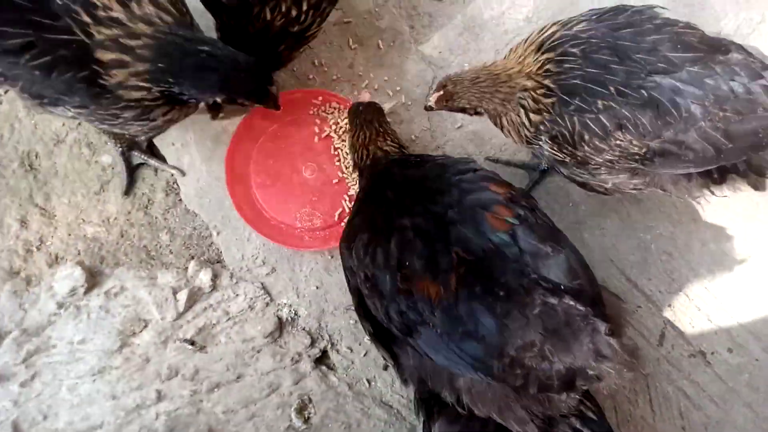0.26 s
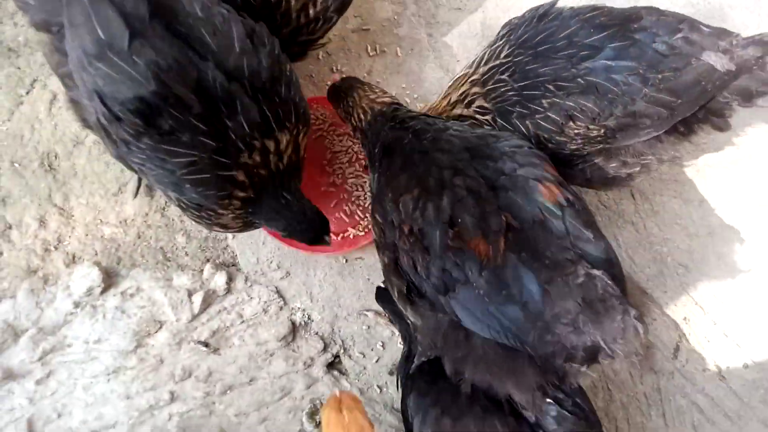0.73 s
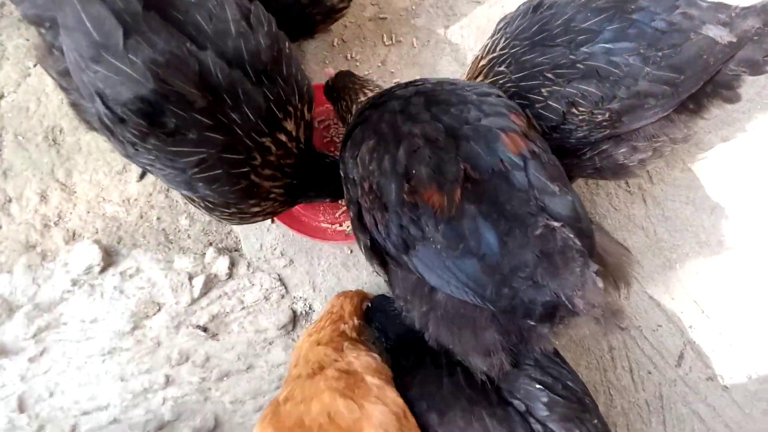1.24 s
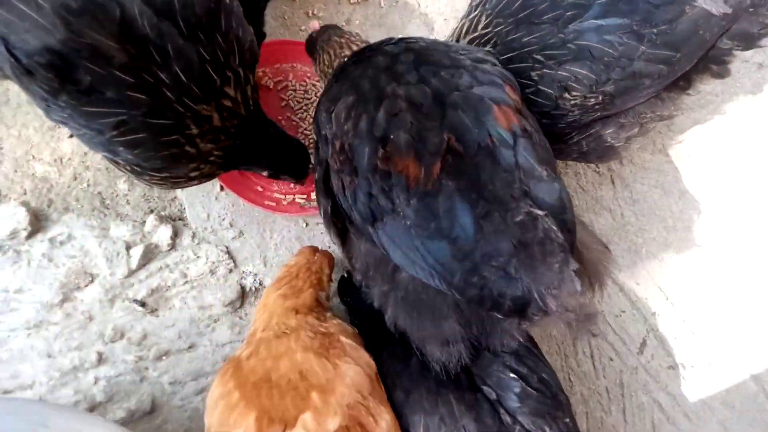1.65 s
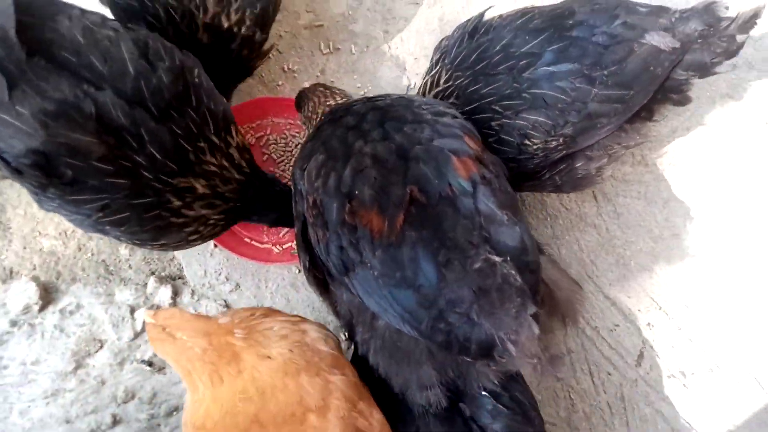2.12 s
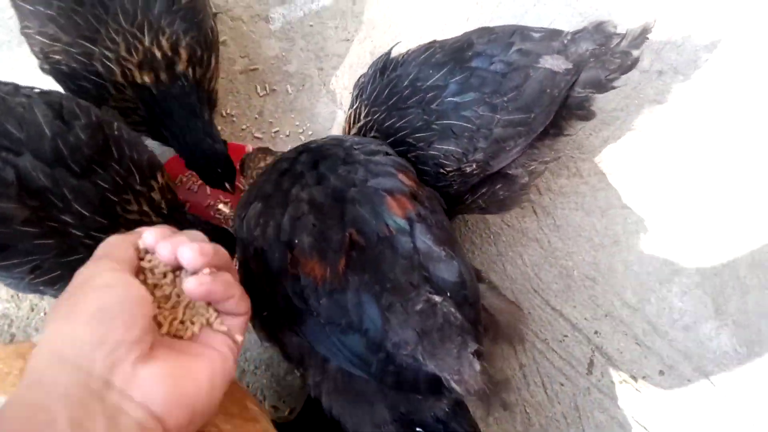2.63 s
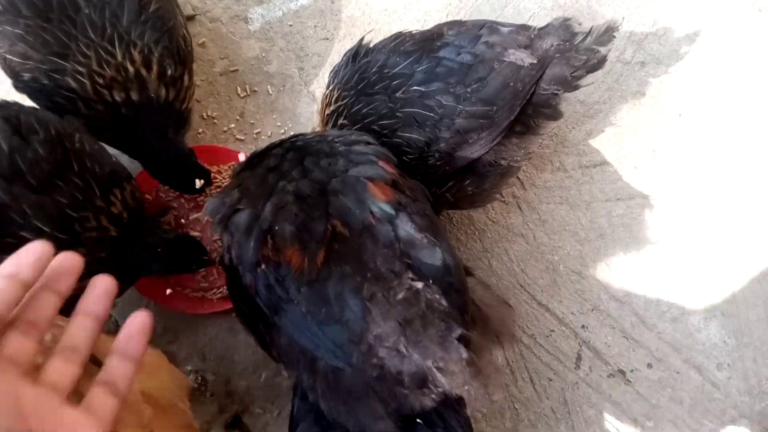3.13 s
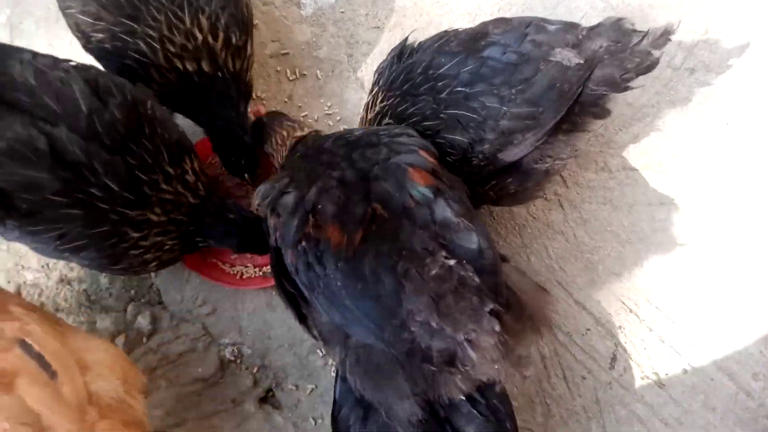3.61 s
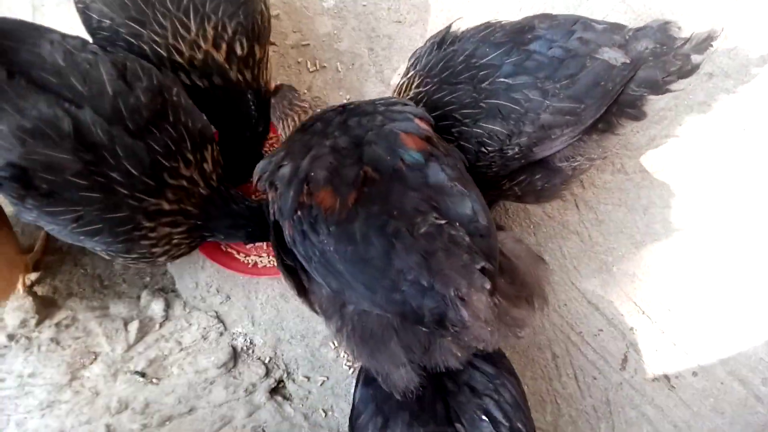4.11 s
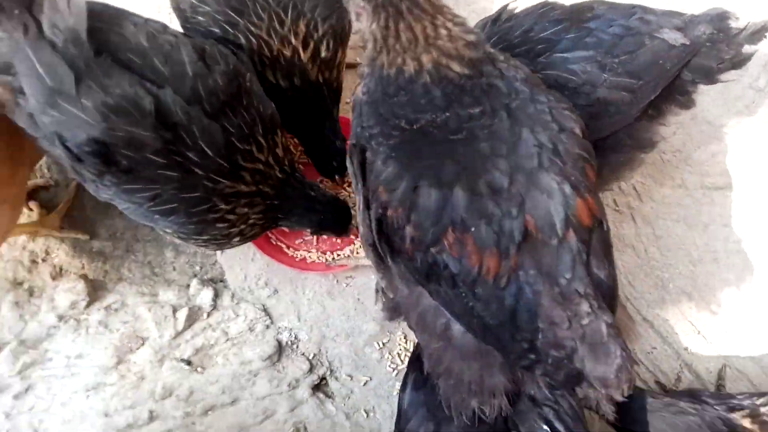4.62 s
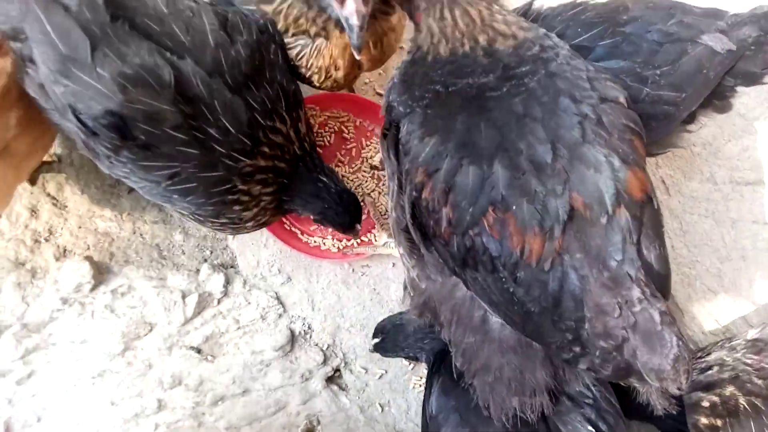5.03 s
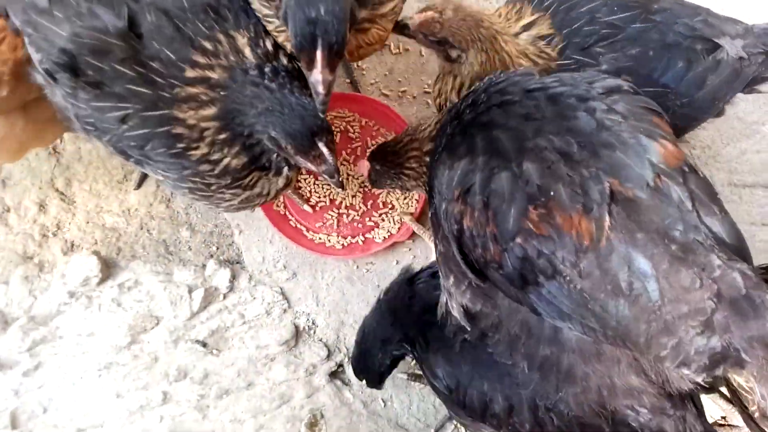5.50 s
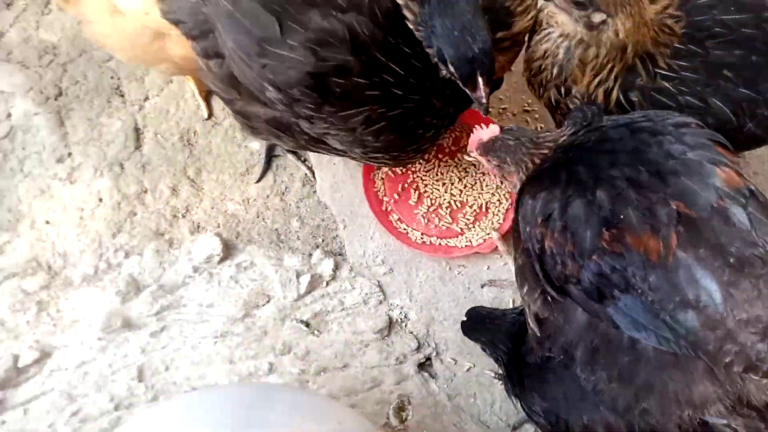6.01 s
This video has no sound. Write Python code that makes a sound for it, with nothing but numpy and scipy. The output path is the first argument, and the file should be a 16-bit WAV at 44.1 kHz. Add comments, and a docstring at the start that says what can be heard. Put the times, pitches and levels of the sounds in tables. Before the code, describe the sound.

A close, dry phone pickup above hens eating from a plastic plate on concrete. From the start, beaks strike in rapid, uneven flurries, about twenty crisp gritty clicks per second, with small plasticky ticks and a bright hiss of scattering kernels; strong taps fall near 0.1 and 0.65 s. At 1.3 s a hollow low knock sounds from a tub beside the microphone, followed by softer bumps, humming scrapes and sizzling grain until about 2.5 s. Around 2.9-3.2 s grain swishes and rattles while pecks cluster. Tub knocks return from 3.6 to 5 s, with a short low cluck near 4.15 s. Pecking nearly stops from 5 to 5.5 s, leaving grain rustle and tiny cheeps. From 5.6 s, pecks and the heaviest hollow thumps resume to the end at about 6.4 s. Faint cheeps and a low, steady yard murmur lie underneath.

```python
"""Hens at a plate of grain

Hens crowd a plastic plate on concrete; the microphone is a phone held close above them.
Beaks burst sprays of noise grains that ring plate and rim; sliding kernels hiss and rattle.
Low raps ring damped modes; beside the phone a hand knocks and scrapes a feed tub with its own air note.
Birds cheep, cluck and coo softly as gliding whistles, over a faint yard murmur of filtered noise."""
import sys
import numpy as np
from scipy import signal
from scipy.fft import rfft, irfft
from scipy.io import wavfile
from scipy.ndimage import uniform_filter1d

SR = 44100
rng = np.random.default_rng(int(sys.argv[2]) if len(sys.argv) > 2 else 0)


def persist_wave(psi):
    """Save psi, clipped to +-1, as 16-bit WAV."""
    counts = np.round(np.clip(psi, -1, 1) * 32767).astype(np.int16)
    wavfile.write(sys.argv[1], SR, np.atleast_2d(counts).T)


N = 275669

# Beak blows close below the phone: start_s, crack_db, plate_db, added_ring_hz, rim_db, scatter_t60_s
BEAK_BLOWS = [(0.0717, -37.5, -48, 1700, -46, 0.025), (0.0847, -38, -33, 1760, -33, 0.0086),
              (0.1021, -25.5, -21, 1710, -18.5, 0.012), (0.1122, -30, -28, 1700, -41, 0.013),
              (0.125, -33, -45, 1700, -46, 0.022), (0.1421, -33, -38, 1670, -36, 0.025),
              (0.159, -30, -47, 1430, -39, 0.02), (0.1792, -27, -32.5, 1680, -31, 0.025),
              (0.2035, -26, -31, 1740, -46, 0.021), (0.2564, -30, -46, 1780, -52, 0.025),
              (0.268, -36.5, -56, 1750, -48, 0.037), (0.3042, -34, -47, 1790, -44, 0.028),
              (0.3224, -34.5, -50, 1780, -43, 0.023), (0.3721, -33, -36.5, 1740, -37, 0.018),
              (0.3846, -32, -51, 1720, -50, 0.018), (0.413, -33.5, -49, 1400, -50, 0.029),
              (0.4605, -36, -44.5, 1760, -51, 0.03), (0.5327, -33, -32.5, 1680, -43, 0.053),
              (0.5426, -28.5, -32, 1650, -32.5, 0.033), (0.5684, -29, -39, 1700, -38, 0.056),
              (0.61, -40, -32, 1400, -33, 0.016), (0.633, -31, -35.5, 1520, -34, 0.0083),
              (0.6487, -23.5, -26, 1680, -24.5, 0.037), (0.6664, -34, -47, 1600, -42, 0.052),
              (0.689, -30.5, -59, 1400, -39, 0.02), (0.73, -40, -52, 1700, -48, 0.021),
              (0.7832, -29, -63, 1710, -45, 0.013), (0.8225, -34.5, -65, 1450, -46, 0.02),
              (0.848, -38, -39.5, 1400, -43, 0.062), (0.9064, -26.5, -31.5, 1740, -31, 0.034),
              (0.9464, -31.5, -48, 1360, -52, 0.021), (1.0794, -40, -72, 1820, -65, 0.025),
              (1.1162, -40.5, -49.5, 1390, -49, 0.04), (1.172, -40, -62, 1820, -49, 0.04),
              (1.236, -41, -39, 1660, -44, 0.022), (1.2551, -33, -30.5, 1430, -34.5, 0.037),
              (1.313, -36, -46, 1600, -35, 0.03), (1.3666, -32.5, -41.5, 1430, -43, 0.03),
              (1.4658, -30, -52, 1760, -41, 0.028), (1.4882, -33, -27, 1600, -27.5, 0.023),
              (1.4979, -36, -37, 1540, -41, 0.03), (1.5226, -32, -32, 1660, -36, 0.034),
              (1.568, -23.5, -51, 1700, -52, 0.0083), (1.5821, -23.5, -42.5, 1370, -43, 0.036),
              (1.6333, -29, -60, 1380, -54, 0.016), (1.669, -33, -39, 1620, -41, 0.061),
              (1.714, -36, -43, 1550, -51, 0.02), (1.742, -37.5, -44, 1530, -51, 0.036),
              (1.782, -35, -48, 1380, -50, 0.075), (1.8364, -39, -46, 1420, -56, 0.023),
              (1.8843, -49, -40, 1450, -50, 0.015), (1.906, -41, -35.5, 1450, -36.5, 0.022),
              (1.9577, -31, -32, 1480, -27.5, 0.017), (2.0164, -36, -41.5, 1830, -40, 0.054),
              (2.0367, -36, -44, 1380, -51, 0.026), (2.1017, -52, -39, 1600, -49, 0.037),
              (2.1243, -51, -35, 1690, -57, 0.021), (2.2135, -41, -46, 1590, -46, 0.057),
              (2.277, -31.5, -33.5, 1400, -39, 0.039), (2.2858, -34.5, -37, 1380, -37, 0.018),
              (2.3512, -37.5, -36.5, 1460, -42, 0.021), (2.3655, -38.5, -58, 1360, -54, 0.018),
              (2.4346, -40.5, -49, 1690, -45, 0.028), (2.4488, -34, -29.5, 1360, -35, 0.028),
              (2.464, -33, -36, 1350, -32.5, 0.028), (2.4833, -34, -38, 1570, -48, 0.016),
              (2.5727, -43, -36.5, 1430, -43, 0.048), (2.6128, -36, -27.5, 1590, -35, 0.026),
              (2.6235, -30, -50, 1700, -44, 0.028), (2.6802, -40, -35, 1600, -37, 0.017),
              (2.692, -30, -46, 1510, -44, 0.017), (2.7242, -43, -38, 1420, -37, 0.027),
              (2.7602, -39, -38, 1396, -48, 0.028), (2.816, -44, -40, 1400, -51, 0.025),
              (2.8247, -31.5, -36.5, 1500, -36, 0.019), (2.8568, -36.5, -33.5, 1450, -39, 0.031),
              (2.891, -35, -42, 1400, -39, 0.017), (2.9144, -29, -34.5, 1440, -43, 0.033),
              (2.9834, -35, -34, 1420, -46, 0.032), (3.0158, -29.5, -38, 1450, -42, 0.025),
              (3.034, -28.5, -38, 1520, -41, 0.029), (3.054, -35, -49, 1780, -48, 0.026),
              (3.0745, -30.5, -40, 1370, -42, 0.019), (3.0872, -25.5, -36, 1530, -48, 0.013),
              (3.122, -29, -39, 1460, -44, 0.012), (3.1376, -25.5, -31.5, 1700, -48, 0.045),
              (3.217, -37, -41, 1410, -39, 0.025), (3.2407, -39, -38, 1510, -42, 0.03),
              (3.264, -33, -34.5, 1590, -38, 0.025), (3.2943, -36, -48, 1670, -49, 0.035),
              (3.3356, -43, -47, 1440, -57, 0.018), (3.3704, -46, -48, 1370, -49, 0.0093),
              (3.3914, -33, -33, 1620, -45, 0.02), (3.3981, -27.5, -30.5, 1650, -34, 0.025),
              (3.468, -43, -38.5, 1430, -44, 0.051), (3.4844, -41, -44, 1500, -51, 0.038),
              (3.531, -30.5, -29, 1520, -31.5, 0.05), (3.5787, -31, -37, 1640, -35, 0.025),
              (3.5923, -31.5, -38, 1370, -38, 0.028), (3.6326, -32.5, -51, 1530, -45, 0.053),
              (3.7421, -37, -36, 1650, -51, 0.029), (3.7499, -31.5, -41, 1440, -54, 0.042),
              (3.7606, -34, -33.5, 1850, -48, 0.039), (3.7739, -41, -38, 1870, -49, 0.029),
              (3.8195, -44, -36, 1400, -44, 0.056), (3.8534, -39, -57, 1350, -49, 0.056),
              (3.895, -33, -35.5, 1470, -34.5, 0.023), (3.938, -42, -38.5, 1860, -53, 0.033),
              (3.9438, -35.5, -38.5, 1490, -33.5, 0.043), (4.0008, -44.5, -43, 1390, -48, 0.05),
              (4.183, -34, -34, 1450, -31, 0.026), (4.2456, -36, -34, 1810, -41, 0.009),
              (4.2694, -24.5, -27, 1500, -24.5, 0.024), (4.3534, -40, -42, 1680, -47, 0.025),
              (4.384, -46, -44, 1350, -47, 0.025), (4.4093, -39.5, -36, 1484, -42, 0.034),
              (4.496, -42, -47, 1630, -55, 0.065), (4.5372, -32.5, -32, 1530, -37, 0.027),
              (4.5503, -36, -38, 1600, -37, 0.022), (4.5998, -35, -35.5, 1550, -38, 0.019),
              (4.6645, -33, -33, 1390, -37, 0.033), (4.7059, -36, -40, 1470, -38.5, 0.027),
              (4.8237, -33, -41, 1560, -37.5, 0.041), (4.859, -34.5, -48, 1540, -46, 0.038),
              (4.9672, -32, -42, 1470, -36, 0.016), (5.3262, -33, -63, 1460, -52, 0.034),
              (5.522, -36, -54, 1370, -49, 0.029), (5.5774, -29, -63, 1730, -63, 0.03),
              (5.6116, -30.5, -46, 1740, -53, 0.033), (5.6348, -25, -47, 1730, -42, 0.037),
              (5.6668, -25.5, -28, 1450, -25.5, 0.021), (5.7134, -27, -30.5, 1510, -27.5, 0.048),
              (5.7568, -25, -27.5, 1740, -28, 0.036), (5.777, -27, -45, 1420, -39, 0.027),
              (5.7974, -29, -35, 1380, -42, 0.035), (5.8132, -28.5, -49, 1740, -37, 0.048),
              (5.8404, -26.5, -50, 1720, -53, 0.063), (5.8686, -26.5, -65, 1680, -61, 0.03),
              (5.9264, -43, -40, 1880, -58, 0.042), (5.9782, -25, -33, 1460, -27, 0.054),
              (6.0155, -27, -34, 1360, -33, 0.05), (6.0397, -34.5, -49, 1600, -39, 0.063),
              (6.1103, -43, -40.5, 1430, -46, 0.049), (6.126, -39.5, -52, 1390, -48, 0.054),
              (6.1683, -37, -35.5, 1410, -38, 0.025), (6.1883, -37, -35, 1660, -34.5, 0.04)]
# Ringing of the middle of the plate: pitch_hz, level_db, t60_s
PLATE_MODES = [(1400, -16, 0.087), (1570, -14, 0.04), (1700, 2.5, 0.0076), (1905, -3, 0.0067)]
# Ringing of the plate's rim: pitch_hz, level_db, t60_s
RIM_MODES = [(2450, 14, 0.0041), (2758, -0.5, 0.023), (3200, -1, 0.016), (3650, 1, 0.028)]
# Tone colour of cracking and sliding kernels: pitch_hz, relative_db
KERNEL_COLOUR = [(1530, -17.5), (2600, 0), (3670, 10.5), (3990, 16), (5060, 16.5), (5420, 17.5),
                 (6470, 19.5), (9550, 4.5), (11700, -16), (13800, -26), (15100, -9.5), (16200, -13)]
RISE_SHARE = 0.048  # a spray swells for this share of its scatter time


def pecks():
    """A spray of kernels swells and dies; it rings the middle and the rim of the plate."""
    t = np.arange(SR // 9) / SR
    crack, plate, rim = np.zeros(N), np.zeros(N), np.zeros(N)
    noises = rng.standard_normal((len(BEAK_BLOWS), 3, len(t)))
    places = rng.standard_normal((len(BEAK_BLOWS), 4, 4))
    for blow, noise, place in zip(BEAK_BLOWS, noises, places):
        start_s, crack_db, plate_db, added_hz, rim_db, t60 = blow
        crack_noise, ring_noise, unevenness = noise
        t60 = np.clip(t60, .004, .2)
        swell = np.minimum(t / (RISE_SHARE * t60), 1) ** 0.6
        decay = np.exp(-np.log(1000) * np.maximum(t / t60 - RISE_SHARE, 0))
        # single kernels stand out of the spray
        spray = swell * decay * undb(1.3 * unit(uniform_filter1d(unevenness, 60)))
        # some sprays crack duller, some brighter
        grit = crack_noise + 0.077 * place[3, 0] * np.roll(crack_noise, 1)
        add(crack, start_s, undb(crack_db) * crest(grit * spray))
        plate_modes = spot(PLATE_MODES, *place[:2]) + [(added_hz, 0, .022)]
        add(plate, start_s, undb(plate_db) * crest(ring(ring_noise * spray, plate_modes)))
        rim_modes = spot(RIM_MODES, *place[2:])
        add(rim, start_s, undb(rim_db) * crest(ring(ring_noise * spray, rim_modes)))
    return colour(crack, KERNEL_COLOUR) + small(plate, 1286) + small(rim, 1940)


# Trickle of grain between the sweeps: time_s, rustle_db, plate_rattle_db
TRICKLE = [(0, -51.5, -60), (.9, -43, -52.5), (1.05, -51, -63), (1.5, -44, -67), (2.3, -55.5, -59),
           (2.41, -61, -74), (2.6, -55.5, -57), (3.3, -53, -69), (4.0, -53.5, -55.5), (4.4, -50, -56),
           (4.46, -61.5, -89), (4.6, -45, -51.5), (5.0, -47, -51), (5.25, -42, -63), (5.8, -41, -55),
           (5.92, -53.5, -56), (6.25, -59, -62)]
# Sweeps of a beak or hand through the grain: peak_s, swell_s, fade_s, rustle_db, plate_rattle_db
GRAIN_SWEEPS = [(0, .01, 0.015, -34, -53), (.195, 0.042, 0.042, -35, -42), (.32, 0.042, 0.026, -44, -53),
                (.42, 0.045, 0.02, -37.5, -52), (.56, 0.016, 0.017, -38, -48),
                (.65, 0.0041, 0.015, -29, -35.5), (.74, 0.014, 0.023, -54, -51),
                (.86, 0.014, 0.019, -34, -40), (0.914, 0.011, 0.019, -27, -39.5),
                (1.12, 0.0065, 0.0065, -42, -56), (1.26, 0.041, 0.025, -38.5, -43),
                (1.31, 0.037, 0.036, -35.5, -50), (1.37, 0.028, 0.026, -39, -43.5),
                (1.5, 0.052, 0.065, -39, -46.5), (1.6, 0.042, 0.071, -34.5, -54),
                (1.73, .02, 0.034, -45, -44), (1.84, 0.038, 0.0081, -47, -55),
                (2.12, 0.0051, 0.038, -47, -44), (2.356, 0.029, 0.017, -43, -48),
                (2.47, 0.015, 0.066, -45, -48), (2.752, 0.022, 0.013, -39.5, -43.5),
                (2.89, 0.016, 0.0093, -38, -50), (2.946, 0.021, 0.047, -27.5, -34),
                (3.03, 0.031, 0.031, -42.5, -44.5), (3.142, 0.022, 0.035, -42, -44),
                (3.228, 0.0084, 0.021, -40.5, -44), (3.28, 0.01, 0.031, -41.5, -44.5),
                (3.4, 0.0089, 0.028, -40.5, -44), (3.61, 0.069, 0.065, -38, -48.5),
                (3.771, .015, 0.019, -47, -46), (4.16, 0.069, 0.046, -39.5, -51),
                (4.32, 0.033, 0.031, -43, -44.5), (4.63, 0.018, 0.033, -37, -60),
                (4.72, 0.02, 0.064, -43, -48.5), (4.858, 0.054, 0.055, -43.5, -49),
                (4.983, 0.047, 0.038, -36, -42.5), (5.121, 0.071, 0.064, -34, -75),
                (5.348, 0.11, 0.077, -37.5, -69), (5.54, 0.076, 0.053, -36, -75),
                (5.66, 0.038, 0.095, -38, -44.5), (5.79, 0.059, .052, -32, -42.5),
                (6.04, 0.014, 0.024, -37.5, -46), (6.19, 0.01, 0.029, -42.5, -43)]
SWEEP_EDGE_DB, SWEEP_POINT = -6, 1.9  # fall after one swell or fade time; roundness of the top


def grain():
    """Rolling kernels hiss and shake the plate: a trickle, and a swell with each sweep."""
    t = np.arange(N) / SR
    rustle_power, plate_power = undb(curves(TRICKLE)) ** 2
    for peak_s, swell_s, fade_s, rustle_db, plate_db in GRAIN_SWEEPS:
        side_s = np.where(t < peak_s, swell_s, fade_s)
        shape_db = SWEEP_EDGE_DB * np.abs((t - peak_s) / side_s) ** SWEEP_POINT
        rustle_power = rustle_power + undb(rustle_db + shape_db) ** 2
        plate_power = plate_power + undb(plate_db + shape_db) ** 2
    rustle = unit(colour(kernels(2500, 2.7, 2.16), KERNEL_COLOUR))
    modes = PLATE_MODES + [(hz, db - 5, t60) for hz, db, t60 in RIM_MODES]
    rattle = unit(small(ring(kernels(600, 0.69, 0.81), modes), 1130))
    return np.sqrt(rustle_power) * rustle + np.sqrt(plate_power) * rattle


# Knocks on the tub beside the phone: start_s, level_db, length_s
TUB_KNOCKS = [(1.177, -47.5, 0.02), (1.23, -38.5, 0.036), (1.283, -32.5, 0.035), (1.306, -15, 0.011),
              (1.352, -22.5, 0.014), (1.374, -27, 0.0054), (1.452, -33, 0.0084), (1.575, -25.5, 0.01),
              (1.62, -34, 0.0089), (1.728, -44, 0.013), (1.791, -23, 0.016), (1.836, -29.5, 0.015),
              (1.894, -39, 0.015), (1.962, -23.5, 0.013), (2.034, -30, 0.011), (2.166, -30.5, 0.0077),
              (2.291, -37.5, 0.012), (2.469, -40, 0.018), (2.533, -42.5, 0.014), (2.803, -36, 0.0056),
              (3.584, -42.5, 0.013), (3.748, -38, 0.0063), (3.766, -35, 0.0088), (3.834, -33, 0.008),
              (3.951, -30.5, 0.025), (4.019, -31.5, 0.013), (4.063, -39, 0.019), (4.179, -41, 0.0063),
              (4.224, -41, 0.011), (4.295, -26, 0.015), (4.345, -35, 0.012), (4.385, -20.5, 0.015),
              (4.442, -35.5, 0.01), (4.482, -38, 0.014), (4.532, -26.5, 0.013), (4.625, -36.5, 0.021),
              (4.664, -19.5, 0.017), (4.708, -34, 0.023), (4.734, -27.5, 0.012), (4.756, -29, 0.0105),
              (4.794, -34, 0.008), (4.966, -27, 0.012), (4.997, -34, 0.0071), (5.044, -31, 0.018),
              (5.315, -33.5, 0.0093), (5.56, -37.5, 0.011), (5.637, -17, 0.021), (5.661, -17.5, 0.011),
              (5.709, -25.5, 0.017), (5.749, -31, 0.012), (5.8, -17.5, 0.012), (5.813, -17.5, 0.017),
              (5.98, -27, 0.007), (6.015, -25, 0.0068), (6.049, -16.5, 0.013), (6.113, -20, 0.012),
              (6.125, -25, 0.011), (6.175, -37, 0.012), (6.181, -28, 0.011)]
# Thud of the tub's base: pitch_hz, level_db, t60_s
TUB_BASE_MODES = [(212.8, -7, 0.12), (150, -9.5, 0.037), (390, -10, 0.018)]
TUB_AIR_HZ = 314.7  # note of the air in the tub
KNOCK_WANDER = .025  # spread of that note, as a share, as the grip bends it from knock to knock


def knocks():
    """A soft push booms the air in the tub for a few swings until the hand damps it, and thuds the base."""
    t = np.arange(SR // 5) / SR
    boom, thud = np.zeros(N), np.zeros(N)
    push = np.hanning(int(0.0013 * SR))
    bends = rng.standard_normal(len(TUB_KNOCKS))
    for (start_s, level_db, length_s), bend in zip(TUB_KNOCKS, bends):
        onset = 1 - np.exp(-t / 0.0014)
        fade = np.exp(-(t / max(length_s, .004)) ** 3.9) + 0.16 * np.exp(-t / 0.045)
        air_hz = TUB_AIR_HZ * (1 + KNOCK_WANDER * bend)
        add(boom, start_s, undb(level_db) * np.sin(2 * np.pi * air_hz * t) * fade * onset)
        add(thud, start_s, undb(level_db) * push / push.sum())
    return boom + undb(-6) * small(ring(thud, TUB_BASE_MODES), 92)


# Low, quickly damped knocks, the plate before 1.1 s and the tub wall after:
# start_s, level_db, upper_modes_db, ring_share (share of the ring time left by damping)
DAMPED_RAPS = [(0.101, -37, 4, 0.3), (0.202, -45.5, -1, 0.31), (0.371, -44, -5, 0.34),
               (0.544, -34.5, 3, 0.29), (0.632, -45, 0, 0.35), (0.905, -48, 6, 0.57),
               (1.304, -32.5, -12, 0.29), (1.72, -35.5, -6, 0.25), (1.795, -41, -5, 0.34),
               (1.886, -39, -2, 0.32), (1.963, -40, -5, 0.33), (2.102, -38, -8, 0.46),
               (2.171, -45, -7, 0.39), (2.276, -42.5, 7, 0.39), (2.334, -48, 0, 0.5),
               (2.401, -47, -2, 0.35), (2.469, -42, -4, 0.6), (2.613, -43.5, 5, 0.27), (2.68, -43, 1, 0.29),
               (2.936, -36, 7, 0.26), (3.121, -46, 5, 0.5), (3.217, -43.5, 4, 0.5), (3.392, -46, 11, 0.5),
               (3.469, -46, 4, 0.5), (3.529, -45, 12.5, 0.4), (3.576, -43, 3, 0.44), (3.743, -41, -2, 0.34),
               (3.83, -49, -7, 0.58), (4.386, -36, -7, 0.5), (4.537, -48, 0, 0.5), (4.669, -41, -1, 0.36),
               (5.639, -34, -8, 0.45), (5.671, -21, -11, 0.87), (5.735, -28, -7, 0.5),
               (5.799, -33, -10, 0.5), (5.98, -25.5, -13, 0.71), (6.015, -26, -12, 0.28),
               (6.044, -35, -20, 0.33), (6.176, -37, -9, 0.6)]
# Undamped ringing for raps and scrapes, three low modes then three upper: pitch_hz, level_db, t60_s
WALL_MODES = [(826, 13, 0.15), (763, -7, 0.068), (926, -2, 0.055), (1430, 7, 0.13), (2200, -1, 0.065),
              (2630, 6.5, 0.054)]


def raps():
    """A hard contact rings damped modes; the firmer the damping, the more it drags into a scratch."""
    t = np.arange(SR // 4) / SR
    rung = np.zeros(N)
    grits = rng.standard_normal((len(DAMPED_RAPS), len(t)))
    for (start_s, level_db, upper_db, ring_share), grit in zip(DAMPED_RAPS, grits):
        ring_share = np.clip(ring_share, .05, 1.2)
        scratch = 0.2 * max(.75 - ring_share, 0) * grit * np.exp(-t / 0.012)
        contact = uniform_filter1d((t == 0) + scratch, 8, origin=3)
        damped = [(hz, db, t60 * ring_share) for hz, db, t60 in WALL_MODES]
        low = crest(ring(contact, damped[:3]))
        upper = crest(ring(contact, damped[3:]))
        add(rung, start_s, undb(level_db) * (low + undb(upper_db) * upper))
    return small(rung, 700)


# Hand scraping in the tub: time_s, air_hum_db, wall_ring_db
TUB_SCRAPE = [(0.0, -53, -59), (0.8, -71, -68), (1.04, -79, -78), (1.24, -74, -70), (1.36, -43, -55),
              (1.43, -43, -52), (1.64, -49.5, -60), (2.05, -48.5, -64), (3.19, -66, -63.5),
              (3.46, -90, -95), (3.85, -49, -61), (3.95, -51, -62), (4.25, -52, -43), (4.46, -50, -69),
              (4.59, -51, -64), (4.75, -41, -53), (4.89, -53.5, -53.5), (5.15, -50.5, -62),
              (5.43, -52.5, -61.5), (5.64, -64, -61), (5.79, -47.5, -69), (5.99, -42, -65),
              (6.13, -45, -61), (6.25, -40, -70)]


def scrape():
    """Fingers and grain rub the tub into humming: many small impacts ring its air, base and wall."""
    hum_db, wall_db = curves(TUB_SCRAPE)
    rub = kernels(250, 2.85, 0.46)
    base = small(ring(rub, TUB_BASE_MODES), 76)
    hum = unit(mode(rub, TUB_AIR_HZ, 0.041) + undb(-7.5) * base)
    damped = [(hz, db, 0.37 * t60) for hz, db, t60 in WALL_MODES[:4]]
    wall = unit(small(ring(kernels(280, 2.7, 0.27), damped), 370))
    return undb(hum_db) * hum + undb(wall_db) * wall


# Bird calls, soft gliding cheeps, a low cluck and a low coo: start_s, end_s, first_hz, middle_hz,
# last_hz, level_db, overtone_db (octave relative to the whistle)
BIRD_CALLS = [(1.166, 1.175, 1800, 1910, 2010, -48, -20), (1.191, 1.221, 2450, 2250, 2640, -42, -20),
              (1.692, 1.71, 2560, 2810, 3400, -41, -18), (2.24, 2.266, 2380, 2250, 2100, -49, -22),
              (2.12, 2.15, 2470, 2860, 3150, -49, -16), (2.53, 2.563, 2250, 2840, 3400, -41, -14),
              (2.665, 2.713, 3090, 2820, 3200, -42, -5), (3.384, 3.385, 3200, 3130, 2940, -40, -20),
              (3.991, 4.096, 934, 905, 806, -52, -25), (4.148, 4.181, 1320, 1313, 1500, -32.5, -35),
              (5.372, 5.403, 2340, 2256, 2310, -44.5, -28), (5.524, 5.589, 2510, 2270, 2320, -48, -26),
              (5.527, 5.566, 3280, 3110, 3100, -44, -20), (5.929, 5.971, 1960, 1870, 2120, -47.5, -7.5),
              (6.157, 6.178, 2120, 2160, 2160, -47, 3), (0.982, 1.038, 920, 1116, 1120, -54, -23)]


def bird_calls():
    """Whistles that swell and fade along a curved glide, with a faint to strong octave overtone."""
    out = np.zeros(N)
    for start_s, end_s, first_hz, middle_hz, last_hz, level_db, overtone_db in BIRD_CALLS:
        u = np.linspace(-1, 1, int((end_s - start_s) * SR))
        slope_hz = (last_hz - first_hz) / 2
        bow_hz = (first_hz + last_hz) / 2 - middle_hz
        hz = middle_hz + slope_hz * u + bow_hz * u ** 2
        phase = 2 * np.pi * np.cumsum(hz) / SR
        whistle = np.sin(phase) + undb(overtone_db) * np.sin(2 * phase)
        add(out, start_s, undb(level_db) * (1 - u ** 2) ** 0.18 * whistle)
    waver = unit(uniform_filter1d(rng.standard_normal(N), 150))  # slightly hoarse
    return out * (1 + 0.3 * waver)


# Tone colour of the yard around the birds: pitch_hz, relative_db
YARD_COLOUR = [(18, -62), (30, -21), (97, 14), (167, -5), (321, 8), (642, -5.5), (825, 3), (1040, -2),
               (1390, -10.5), (3000, 2), (3900, -19.5), (6600, -120)]
YARD_DB = -58.5  # rms level


def yard():
    """Low steady murmur of the surroundings, as filtered noise."""
    return undb(YARD_DB) * unit(colour(rng.standard_normal(N), YARD_COLOUR))


def undb(db):
    """Decibels to gain."""
    return 10 ** (np.asarray(db) / 20)


def unit(x):
    """Scale to rms 1."""
    return x / np.sqrt(np.mean(x ** 2))


def crest(x):
    """Scale so that the loudest 4 ms have rms 1."""
    return x / np.sqrt(uniform_filter1d(x ** 2, SR // 250).max())


def add(track, s, x):
    """Mix x into track from time s."""
    i = max(int(s * SR), 0)
    track[i:i + len(x)] += x[:N - i]


def curves(table):
    """Columns of a curve table, one value a sample."""
    s, *columns = np.transpose(table)
    return [np.interp(np.arange(N) / SR, s, c) for c in columns]


def kernels(per_s, spread_db, hush):
    """Random tiny impacts of uneven size over a hush of countless smaller ones; rms 1."""
    struck = rng.random(N) < per_s / SR
    hits = struck * rng.standard_normal(N) * undb(spread_db * rng.exponential(size=N))
    return unit(unit(hits) + hush * rng.standard_normal(N))


def mode(x, hz, t60):
    """One damped resonance; a unit click rings it with peak near 1."""
    pole = np.exp(2j * np.pi * hz / SR - np.log(1000) / (max(t60, .003) * SR))
    return signal.lfilter([1], [1, -pole], x).imag


def ring(x, modes):
    """All modes of one object."""
    return sum(undb(db) * mode(x, hz, t60) for hz, db, t60 in modes)


def spot(modes, gains, shifts):
    """The same modes as struck at another place: other strengths, slightly other pitch."""
    return [(hz * (1 + 0.021 * shift), db + 3.9 * gain, t60)
            for (hz, db, t60), gain, shift in zip(modes, gains, shifts)]


def small(x, hz):
    """A small object radiates little below its lowest mode."""
    return signal.sosfilt(signal.butter(3, hz, "high", fs=SR, output="sos"), x)


def colour(x, points, size=4096):
    """Causal minimum-phase filter through (Hz, dB) points, unit energy."""
    hz, db = np.transpose(points)
    f = np.maximum(np.arange(size // 2 + 1) * SR / size, 1)
    cepstrum = irfft(np.log(undb(np.interp(np.log(f), np.log(hz), db))))
    # fold the cepstrum forward in time
    cepstrum[1:size // 2] *= 2
    cepstrum[size // 2 + 1:] = 0
    h = irfft(np.exp(rfft(cepstrum)))
    return signal.fftconvolve(x, h / np.sqrt(np.sum(h ** 2)))[:len(x)]


# Lift of the highest sizzle, stronger when grain slides in the tub beside the phone
# than behind the birds: time_s, lift_db
SIZZLE_LIFT = [(0, 9.5), (.6, 10.5), (1.2, 15.5), (1.9, 11), (2.3, 7), (3.4, 10), (3.9, 12.5), (4.6, 7.5),
               (5.3, 16.5), (5.8, 10.5), (6.25, 7)]


def scene():
    """Everything close to the phone, with a short haze of echoes from floor, walls and birds."""
    near = pecks() + raps() + bird_calls() + knocks()
    t = np.arange(SR // 4) / SR
    # echoes start after 3 ms and die by 60 dB in 0.15 s
    haze = rng.standard_normal(len(t)) * np.exp(-np.log(1000) * t / 0.15) * (t > .003)
    echo = signal.fftconvolve(small(near, 344), haze / np.sqrt(np.sum(haze ** 2)))[:N]
    feed = near + undb(-13) * echo + grain()
    top = signal.sosfiltfilt(signal.butter(4, 11000, "high", fs=SR, output="sos"), feed)
    sizzle = (undb(curves(SIZZLE_LIFT)[0]) - 1) * top
    return (feed + sizzle + scrape() + yard())[None]


TOP_HZ = 16000  # upper edge of the phone's microphone


def record(dry):
    """The phone drops the deepest bass and cuts the top."""
    low = signal.sosfilt(signal.butter(2, 55, "high", fs=SR, output="sos"), dry)
    return signal.sosfilt(signal.ellip(10, .2, 70, TOP_HZ, fs=SR, output="sos"), low)


dry = scene()
out = record(dry)
persist_wave(out)
```